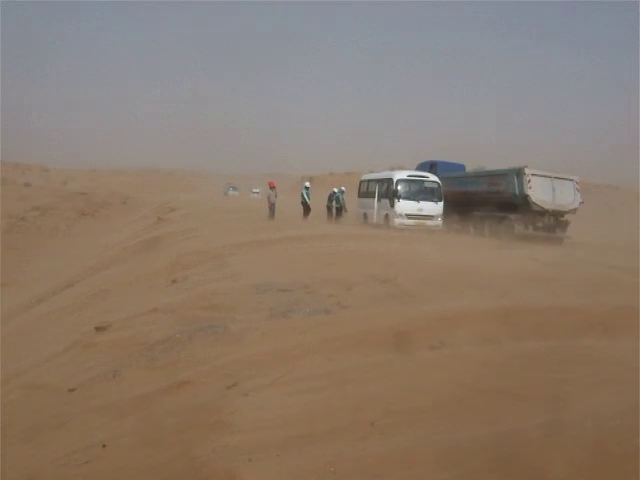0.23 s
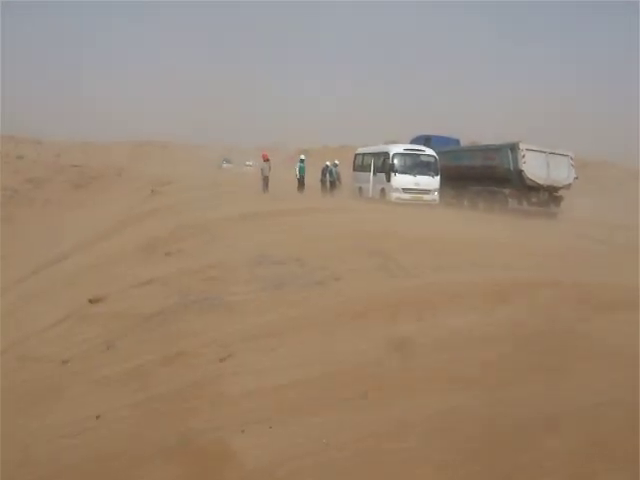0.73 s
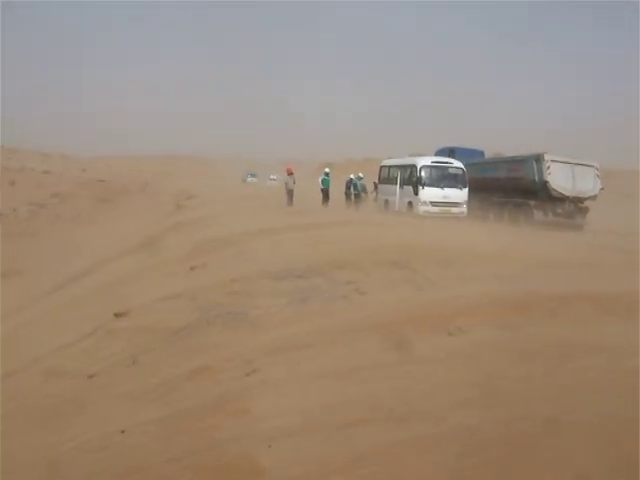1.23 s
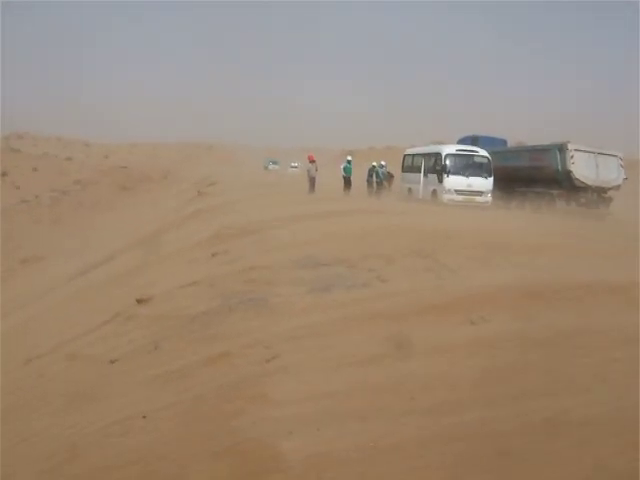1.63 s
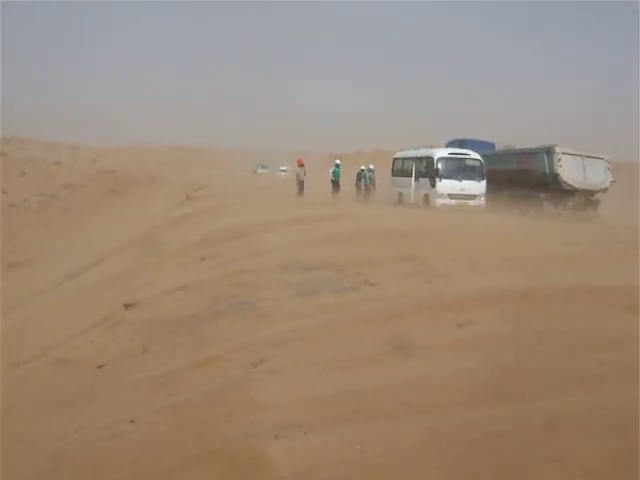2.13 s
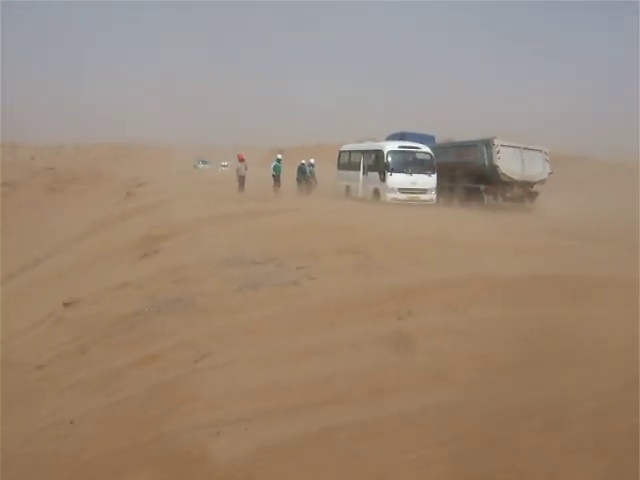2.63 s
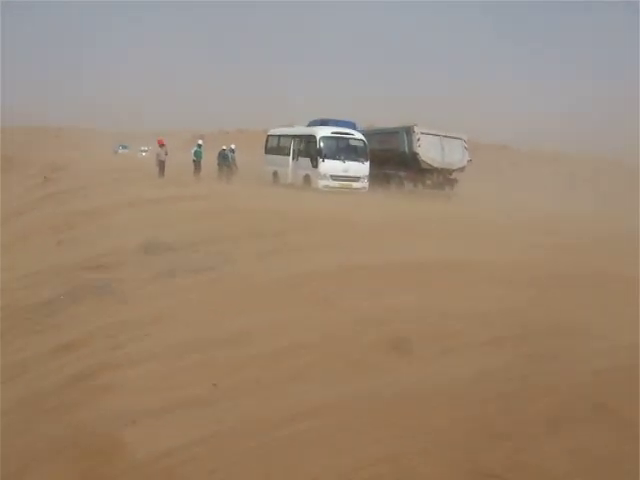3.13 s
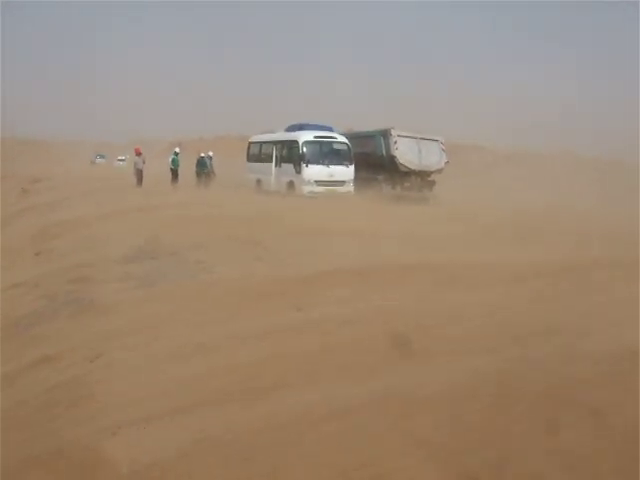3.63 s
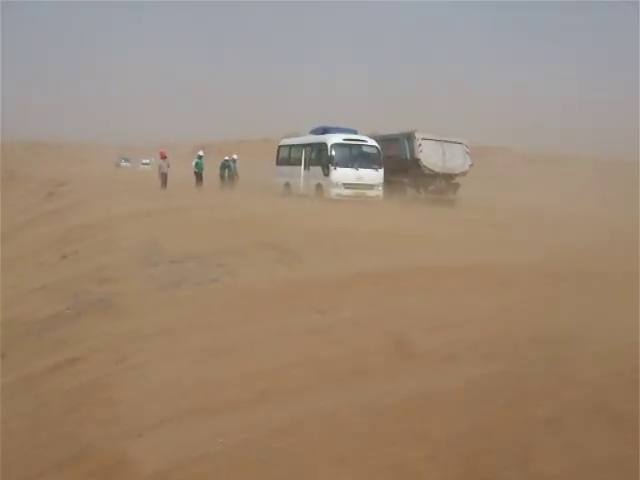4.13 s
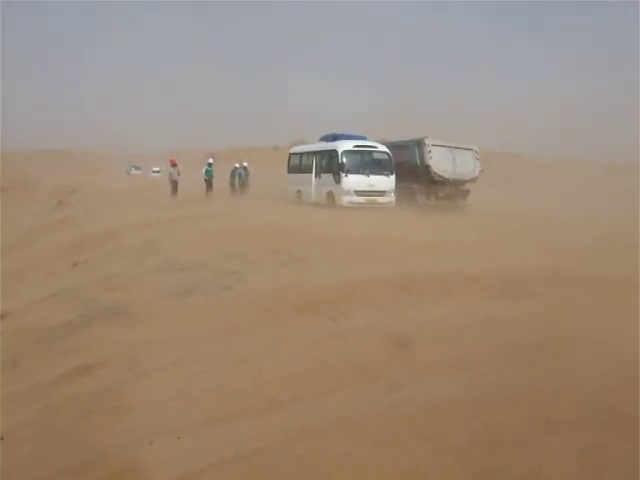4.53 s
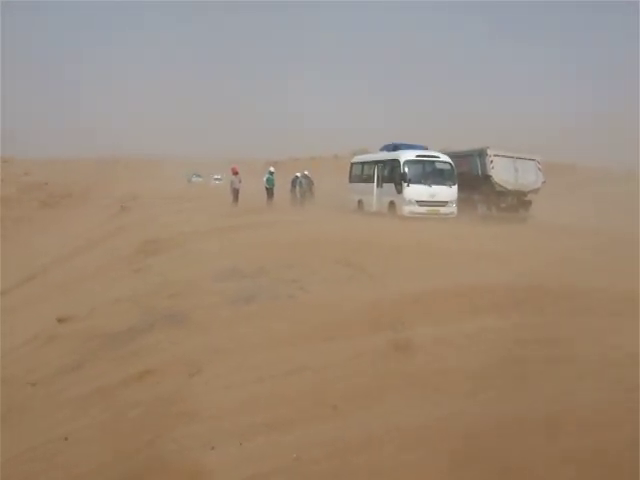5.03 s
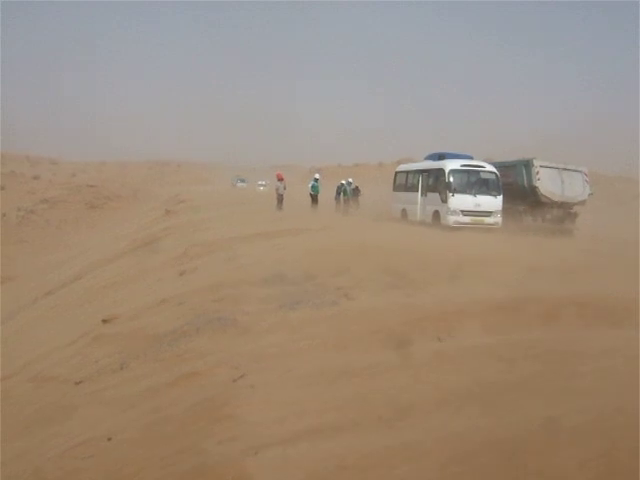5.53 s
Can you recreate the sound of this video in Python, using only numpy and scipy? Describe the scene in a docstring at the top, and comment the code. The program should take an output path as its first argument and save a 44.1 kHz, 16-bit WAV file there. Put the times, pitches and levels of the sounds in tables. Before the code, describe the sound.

Strong desert wind batters a bare small microphone: deep surging rumble, lumpy thumps and constant irregular crackling bursts, with a faint gritty hiss.

```python
"""Sandstorm on open dunes

Wind heard through the port of a small hand-held camera with a bare microphone.
Gusts press on the port as a deep, surging rumble and lumpy thumps: noise shaped by spectra and envelopes.
Small turbulence churns with the thumps; eddies crackle dull or sharp as short bursts with a push of pressure.
Hard blows add hollow knocks, blown sand is a gritty hiss, and the highest peaks overload the recorder."""
import sys
import numpy as np
from scipy import signal
from scipy.fft import rfft, irfft, next_fast_len
from scipy.io import wavfile
from scipy.ndimage import uniform_filter1d, map_coordinates

SR = 44100
rng = np.random.default_rng(int(sys.argv[2]) if len(sys.argv) > 2 else 0)


def transcribe(u):
    """Save the signal u as a 16-bit wav file named by the first command-line argument.

    u: samples, shape (n,) or (channels, n), limited to [-1, 1]; the rate is SR.
    q: integer samples, one column per channel.
    """
    v = np.clip(np.atleast_2d(u).T, -1, 1)
    q = np.round(v * 32767).astype(np.int16)
    wavfile.write(sys.argv[1], SR, q)


N = 254456
T = np.arange(N) / SR  # time of each sample, s


def amp(db):
    """Decibels are logarithmic: 20 dB is a tenfold gain in amplitude."""
    return 10 ** (np.asarray(db) / 20)


def unit(x):
    """Normalisation by power: x at rms 1."""
    return x / np.sqrt(np.mean(x ** 2) + 1e-20)


def gain_at(points, hz):
    """Spectral gain, interpolated in dB between (frequency_hz, level_db) points on a log-frequency axis."""
    point_hz, db = np.transpose(points)
    return amp(np.interp(np.log(hz + 1), np.log(point_hz + 1), db))


def wobble(rate):
    """Band-limited random modulation: a smooth curve through `rate` random knots a second."""
    knots = rng.standard_normal(4096)
    return map_coordinates(knots, [T * rate], mode="wrap")


def filtered(x, response):
    """Linear filtering: the spectrum of x times a response of frequency."""
    m = next_fast_len(N + SR // 2)  # zero padding
    hz = np.fft.rfftfreq(m, 1 / SR)
    return irfft(rfft(x, m) * response(hz), m)[:N]


def rush(spectrum):
    """Turbulent noise: white noise shaped to the given spectrum, at rms 1."""
    return unit(filtered(rng.standard_normal(N), lambda hz: gain_at(spectrum, hz)))


def even(x, seconds):
    """Envelope levelling: x divided by its running rms, so its power stays nearly steady."""
    size = max(int(seconds * SR), 2)
    power = uniform_filter1d(uniform_filter1d(x ** 2, size), size)
    return unit(x / np.sqrt(np.abs(power) + 1e-9))


def whitened(x, size=220):
    """Spectral whitening: the spectrum of a short burst, levelled over bands `size` bins wide."""
    z = rfft(x)
    power = uniform_filter1d(np.abs(z) ** 2, size)
    return z / np.sqrt(np.abs(uniform_filter1d(power, size)) + 1e-12)


def lull(s, lull_s=0.011):
    """Slackening pressure at the times s: a sum of bell curves, each of depth 1 and 1/e half-length lull_s."""
    # moments when the wind slackens: middle_s
    middles = [0.124, 0.235, 0.344, 0.83, 1.17, 1.34, 1.924, 2.044, 2.088, 2.195, 2.229, 2.462, 2.521,
               2.675, 3.121, 3.157, 3.665, 3.838, 3.941, 4.071, 4.41, 4.531, 5.061, 5.104, 5.195, 5.542]
    return sum(np.exp(-((s - middle) / lull_s) ** 2) for middle in middles)


def buffeting(rumble_db=-18.0, buffet_db=-21.5, lump_db=2.9, roll_db=0.66, surge_s=0.024, lull_db=-3.5):
    """Eddy size sets pitch: large slow whirls rumble, smaller ones thump the port; both surge and slacken."""
    # relative spectra of the large and the smaller whirls: frequency_hz, density_db
    rumble_spectrum = [(3, -25.5), (10, -12), (24, 3), (45, -1.5), (68, -3.5), (100, -27), (200, -54.5),
                       (500, -120)]
    buffet_spectrum = [(25, -42.5), (55, -15.5), (80, 2), (115, -2), (170, -7.5), (250, -15.5), (420, -25),
                       (1000, -47), (2500, -120)]
    # surges and sags of wind pressure: middle_s, rumble_rise_db, buffet_rise_db
    surge_rows = [(0.07, 6, -3.5), (0.28, -3, 9), (0.39, 8.5, 3), (0.539, -5, 8.5), (0.625, 8.5, 6.5),
                  (0.72, 3, 1), (0.79, 4, 6), (0.911, 5, 0), (0.97, 5, 3.5), (1.061, 4.5, -4),
                  (1.235, 2, -8.5), (1.447, 8.5, 4.5), (1.509, 5, -1), (1.61, 6, 1.5), (1.725, 5.5, 3),
                  (1.83, 5.5, 1.5), (2.015, -11, 5.5), (2.11, 4, 1), (2.169, 8, -1.5), (2.27, -4.5, 4),
                  (2.32, -2.5, 3.5), (2.37, 4.5, 10.5), (2.58, 1, 3.5), (2.64, 7.5, -9), (2.93, 3, 7.5),
                  (3.026, 3.5, -3.5), (3.08, 5, -2), (3.251, 8.5, 5.5), (3.3, -8, 3), (3.431, 0, 8),
                  (3.59, -1, 7.5), (3.8, 5, 4.5), (3.915, -1, 7.5), (3.975, 4.5, 3.5), (4.034, 5, 4.5),
                  (4.13, -7, 6), (4.47, -2, -2), (4.59, 4.5, 4.5), (4.69, 9.5, 2.5), (4.721, -2.5, -8),
                  (4.83, -0.5, 5), (5.22, 6, 3), (5.269, 2, -6.5), (5.4, 2, 1.5), (5.5, 7.5, 0),
                  (5.586, 7, 0.5), (5.665, 8.5, -1.5), (5.742, -4, 7)]
    surges = sum(np.outer(rises, np.exp(-((T - s) / surge_s) ** 2)) for s, *rises in surge_rows)
    deep, buffet = surges + lull_db * lull(T)
    rumble = even(rush(rumble_spectrum), seconds=0.032) * amp(roll_db * wobble(21))
    lumps = rush(buffet_spectrum) * amp(lump_db * wobble(55))
    thumps = even(lumps, seconds=0.044)
    return amp(deep + rumble_db) * rumble, amp(buffet + buffet_db) * thumps


def churning_db(s, lull_db=-5):
    """Turbulence intensity follows the wind: relative level at the times s, lower in the lulls."""
    # churning air between the eddies: time_s, relative_level_db
    levels = [(0.05, -31.5), (0.41, -34), (1.04, -30.5), (1.45, -30), (1.92, -36), (2.1, -38.5),
              (2.38, -29.5), (2.68, -35.5), (3.4, -30.5), (3.95, -34.5), (4.5, -33.5), (4.8, -31),
              (5.2, -35), (5.37, -32.5), (5.77, -32)]
    return np.interp(s, *np.transpose(levels)) + lull_db * lull(s)


def churn(thumps, level_db=-1.66, follow=1.0, flutter_db=4.0, sputter_db=4.5, peak_db=11.5):
    """Energy cascade: each thump drags a fit of small-scale turbulence with it, up to a ceiling."""
    # relative spectrum of the small-scale turbulence: frequency_hz, density_db
    swirl = [(80, -20.5), (170, -14.5), (280, -0.5), (500, -3), (1000, -16), (2000, -22), (3200, -50.5),
             (6000, -66.5), (9000, -79.5)]
    force = np.abs(signal.hilbert(even(thumps, seconds=0.055)))  # envelope of the thumps
    flicker = amp(flutter_db * wobble(75) + sputter_db * wobble(260))
    fits = unit((force + 0.049) ** follow * flicker)
    limited = np.tanh(fits / amp(peak_db))
    return amp(churning_db(T) + level_db) * unit(rush(swirl) * limited)


def sand(level_db=9.0, shimmer_db=0.84, grain_db=1.0):
    """Many tiny impacts merge into noise: sheets of fine grains sweep past in a soft, slightly gritty hiss."""
    # drifting sand: time_s, relative_level_db
    drifts = [(0.05, -56), (0.42, -57.5), (0.58, -53.5), (0.8, -58.5), (2.03, -57.5), (2.15, -52),
              (2.21, -57), (2.33, -50.5), (2.48, -58.5), (2.82, -57.5), (2.94, -51.5), (3.03, -53),
              (3.12, -60.5), (3.2, -47.5), (3.4, -50), (3.59, -53), (3.7, -51.5), (3.93, -54.5),
              (4.1, -50.5), (4.2, -52.5), (4.34, -50), (4.44, -52.5), (4.68, -54), (4.98, -51),
              (5.27, -54.5), (5.77, -56.5)]
    # relative spectrum of the grains: frequency_hz, density_db
    hiss = [(300, 1.5), (900, 10.5), (2000, 0.5), (3400, -2.5), (5000, -4.5), (7200, -3.5), (8000, -1),
            (9000, -10.5)]
    level = np.interp(T, *np.transpose(drifts))
    grains = unit(rush(hiss) * amp(grain_db * wobble(700)))
    return amp(level + level_db + shimmer_db * wobble(30)) * grains


def faint_eddies(level_db=8.5, range_db=7, length=0.0036, corner_hz=1350, scatter=0.18, count=200):
    """Irregular vortex shedding: rows of many small eddies at uneven gaps, their levels following the churning."""
    place, weakness = rng.random((count, 2)).T
    life, tone = np.exp(scatter * rng.standard_normal((count, 2))).T
    s = (np.arange(count) + place) / count * N / SR
    db = churning_db(s) + level_db - range_db * weakness
    return np.column_stack([s, db, length * life, corner_hz * tone])


def eddies(rows, level_db=3.0, low_hz=110, thinning=0.075, steepness=1.354, rise=0.89, fall=1.0,
           grit_db=6.0, push=1.0, push_width=.45, wake_db=-20, wake_s=0.01, core_hz=2200):
    """Vortex impact: a pressure push wrapped in turbulence, pink up to its corner and falling steeply above."""
    # colouring by the port: frequency_hz, gain_db
    port_gain = [(250, 5), (650, 0), (1300, -1), (3100, 2.5), (4200, 0), (8000, 4)]
    size = 4096
    t = (np.arange(size) - size // 2) / SR
    hz = np.fft.rfftfreq(size, 1 / SR) + 1
    out = np.zeros(N + 2 * size)
    for s, db, length, corner_hz in rows:
        air, jolts = rng.standard_normal((2, size))
        # the port leaks slow pressure away and colours the rest; brighter eddies carry less bass
        u = 1j * hz / (low_hz + thinning * corner_hz)
        port = gain_at(port_gain, hz) * u * u / (1 + np.sqrt(2) * u + u * u)
        # the flow tears off abruptly and settles more gently
        attack = (t / (length * rise)) ** 4 * 2
        release = (t / (length * fall)) ** 2 * 2
        swell = 2 ** -np.where(t < 0, attack, release)
        # a weaker wake trails behind it
        wake = amp(wake_db) * (t > 0) * np.exp(-np.abs(t) / wake_s)
        # it breaks up in jolts of about a millisecond
        jolt = unit(uniform_filter1d(jolts, size=40))
        grit = amp(grit_db * np.minimum(jolt, 1.5))
        colour = hz ** -.5 * (1 + (hz / corner_hz) ** 2) ** -steepness
        # the treble stops with the blow; only the dull body carries on into the wake
        body = whitened(air * (swell + wake) * grit)
        core = whitened(air * swell * grit)
        dull = 1 / (1 + (hz / core_hz) ** 4)
        burst = unit(irfft((dull * body + (1 - dull) * core) * colour * port))
        # a pointed push inside a wider, shallow suction
        reach = np.abs(t) / (length * push_width)
        cusp = unit(np.exp(-reach) - np.exp(-reach / 4) / 4)
        # the turbulence presses the same way as the push
        blow = unit(burst * np.sign(burst @ cusp) + push * cusp)
        # longer eddies carry more energy
        gain = amp(db + level_db) * np.sqrt(length * SR / size)
        out[round(s * SR):][:size] += gain * blow
    return out[size // 2:][:N]  # each row's time is the middle of its eddy


def knocks(level_db=0.0, cycles=1.14):
    """Cavity resonance: a square blow makes the air in the port swing for two or three cycles, a hollow knock."""
    # blows that make the port ring: middle_s, level_db, pitch_hz
    blows = [(0.191, -9, 545), (1.238, -11, 606), (1.307, -11.5, 660), (1.355, -11.5, 910),
             (1.601, -10.5, 990), (1.711, -17.5, 527), (3.736, -11, 704)]
    out = np.zeros(N)
    for (s, db, hz), phase in zip(blows, rng.random(len(blows))):
        turns = (T - s) * hz
        swell = np.exp(-(turns / cycles) ** 2)
        out += amp(db + level_db) * swell * np.cos(2 * np.pi * (turns + phase))
    return out


def scene():
    """Superposition: the pressures of wind on the port and of blown sand add, in one channel."""
    # the hardest eddies that hit the port: middle_s, relative_level_db, length_s, corner_hz
    hard_eddies = [(0.045, -12, 0.0057, 775), (0.074, -20, 0.003, 2180), (0.081, -21, 0.0036, 2080),
                   (0.108, -28.5, 0.004, 2000), (0.158, -19, 0.0026, 1900), (0.168, -18, 0.006, 1500),
                   (0.183, -20.5, 0.004, 1810), (0.193, -16, 0.0028, 3770), (0.218, -19.5, 0.0083, 870),
                   (0.281, -18, 0.0093, 1630), (0.292, -18.5, 0.0047, 1800), (0.3005, -21.5, 0.0015, 2200),
                   (0.323, -16, 0.0028, 910), (0.368, -23.5, 0.0059, 1580), (0.386, -26.5, 0.0084, 1950),
                   (0.403, -19, 0.0046, 900), (0.425, -20, 0.005, 900), (0.475, -15.5, 0.0062, 860),
                   (0.494, -16.5, 0.0064, 520), (0.539, -19.5, 0.0036, 1880), (0.584, -21.5, 0.0098, 1350),
                   (0.63, -14.5, 0.0036, 1170), (0.667, -19, 0.0036, 780), (0.704, -22, 0.0032, 750),
                   (0.722, -24, 0.02, 1120), (0.749, -20.5, 0.0042, 1570), (0.846, -16, 0.0012, 900),
                   (0.862, -18, 0.011, 1330), (0.884, -13, 0.0063, 910), (0.96, -15, 0.0018, 950),
                   (1.012, -23.5, 0.005, 2000), (1.045, -22.5, 0.0095, 1240), (1.0775, -14.5, 0.0019, 2100),
                   (1.0825, -10.5, 0.0018, 3220), (1.086, -19, 0.0014, 2000), (1.1058, -16, 0.0016, 4200),
                   (1.11, -23.5, 0.0023, 4200), (1.1145, -13, 0.0026, 3380), (1.118, -19.5, 0.002, 5500),
                   (1.122, -16.5, 0.0013, 3770), (1.126, -21.5, 0.0035, 4050), (1.131, -16.5, 0.0023, 6550),
                   (1.139, -17, 0.0014, 6400), (1.143, -19.5, 0.0026, 5000), (1.146, -16, 0.0004, 7000),
                   (1.151, -17.5, 0.0038, 3980), (1.156, -22.5, 0.0027, 3000),
                   (1.238, -13.5, 0.00079, 2070), (1.288, -29, 0.0018, 2200), (1.307, -13, 0.0025, 1570),
                   (1.3555, -13.5, 0.00088, 2880), (1.383, -19.5, 0.0076, 1570), (1.402, -19, 0.0041, 1370),
                   (1.482, -22, 0.0041, 860), (1.508, -11, 0.0034, 900), (1.595, -22, 0.0023, 2420),
                   (1.601, -14.5, 0.0028, 2030), (1.627, -22.5, 0.004, 1680), (1.655, -16, 0.0054, 1710),
                   (1.662, -25, 0.0044, 1440), (1.711, -16, 0.0016, 1700), (1.724, -13, 0.0044, 795),
                   (1.75, -21.5, 0.0074, 3000), (1.772, -20.5, 0.0026, 1370), (1.786, -24.5, 0.01, 2360),
                   (1.8413, -8, 0.0012, 3000), (1.845, -18, 0.0011, 4000), (1.878, -21, 0.0054, 2630),
                   (1.891, -15, 0.0041, 4200), (1.902, -22, 0.0034, 1870), (1.944, -22, 0.0051, 3080),
                   (1.955, -15, 0.0033, 1054), (1.993, -20.5, 0.0061, 1370), (2.017, -19.5, 0.0031, 2380),
                   (2.114, -12, 0.0065, 960), (2.166, -21, 0.0068, 2150), (2.288, -17, 0.0104, 1470),
                   (2.302, -18.5, 0.0024, 1110), (2.329, -19.5, 0.0056, 1450), (2.355, -22.5, 0.02, 1460),
                   (2.379, -12.5, 0.00029, 6000), (2.387, -24.5, 0.0012, 4470), (2.3915, -19, 0.0021, 2740),
                   (2.438, -16.5, 0.0016, 3830), (2.444, -13, 0.0025, 1910), (2.49, -31.5, 0.0096, 3130),
                   (2.51, -21, 0.0052, 1290), (2.554, -19, 0.0071, 1580), (2.565, -25, 0.0036, 1430),
                   (2.58, -16, 0.0066, 1100), (2.616, -9, 0.0034, 1010), (2.65, -13.5, 0.0039, 1500),
                   (2.718, -13, 0.0042, 744), (2.735, -20, 0.0042, 1220), (2.764, -24, 0.0032, 1520),
                   (2.787, -17.5, 0.01, 1660), (2.81, -15, 0.0043, 670), (2.86, -21, 0.0035, 1200),
                   (2.877, -16, 0.0039, 1010), (3.027, -8.5, 0.0031, 1250), (3.036, -24, 0.0098, 1680),
                   (3.055, -12, 0.0015, 3000), (3.062, -21, 0.0038, 2000), (3.084, -15.5, 0.0017, 2480),
                   (3.0875, -24, 0.001, 4970), (3.243, -17.5, 0.0076, 1100), (3.268, -21, 0.0086, 1300),
                   (3.298, -13, 0.0023, 1470), (3.369, -16, 0.0019, 850), (3.391, -16, 0.004, 1250),
                   (3.439, -15.5, 0.0044, 1810), (3.459, -19.5, 0.0026, 1780), (3.573, -15.5, 0.005, 910),
                   (3.603, -9.5, 0.0032, 557), (3.736, -12.5, 0.0026, 1240), (3.86, -17, 0.0033, 740),
                   (3.902, -15.5, 0.003, 1430), (3.911, -15, 0.0033, 1890), (3.974, -19, 0.0046, 1310),
                   (4.124, -13, 0.0057, 1050), (4.129, -23, 0.0022, 2800), (4.1675, -16.5, 0.0032, 1410),
                   (4.245, -16, 0.0049, 900), (4.329, -13, 0.005, 684), (4.389, -12, 0.0024, 950),
                   (4.437, -20.5, 0.003, 1520), (4.473, -22, 0.0048, 800), (4.488, -21.5, 0.014, 1690),
                   (4.505, -25, 0.0039, 2680), (4.562, -16, 0.004, 650), (4.591, -14, 0.0051, 1530),
                   (4.609, -20, 0.00098, 3200), (4.682, -29, 0.012, 3100), (4.702, -28, 0.0064, 2180),
                   (4.763, -19, 0.0016, 910), (4.852, -14, 0.0066, 1010), (5.029, -19, 0.0071, 1250),
                   (5.22, -12.5, 0.0041, 990), (5.332, -15, 0.00053, 1460), (5.347, -20.5, 0.0029, 1750),
                   (5.363, -22, 0.0116, 1250), (5.385, -20.5, 0.0028, 2500), (5.405, -19.5, 0.0082, 1170),
                   (5.417, -20, 0.009, 2680), (5.477, -13, 0.0021, 1010), (5.491, -15, 0.0087, 1800),
                   (5.514, -22, 0.0047, 2180), (5.565, -20, 0.0038, 650), (5.583, -17.5, 0.0024, 1240),
                   (5.596, -22.5, 0.0059, 1370), (5.643, -18.5, 0.0012, 2330), (5.653, -22.5, 0.0038, 2200),
                   (5.717, -16, 0.0024, 1800), (5.727, -22, 0.0036, 2200), (5.736, -24, 0.0064, 1900),
                   (5.763, -25.5, 0.0048, 2500)]
    rumble, thumps = buffeting()
    crackle = eddies(np.vstack([hard_eddies, faint_eddies()]))
    return (rumble + thumps + churn(thumps) + crackle + knocks() + sand())[None]


def record(dry):
    """Saturation and band-limiting: the input opens after a moment, the highest peaks flatten, treble is cut."""
    # treble loss of the recorder: frequency_hz, gain_db
    treble = [(7300, 0), (7900, -7.5), (8300, -12.5), (8700, -15.5), (9000, -39.5)]
    top_hz = 8900  # nothing passes above
    start_s, opening_s = .036, .002
    ceiling, hardness = .71, 10  # amplitude; sharpness of the bend
    x = dry[0] * np.clip((T - start_s) / opening_s, 0, 1)
    x = x / (1 + np.abs(x / ceiling) ** hardness) ** (1 / hardness)
    return filtered(x, lambda hz: gain_at(treble, hz) * (hz < top_hz))[None]


dry = scene()
out = record(dry)
transcribe(out)
```